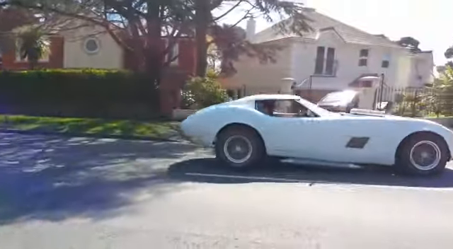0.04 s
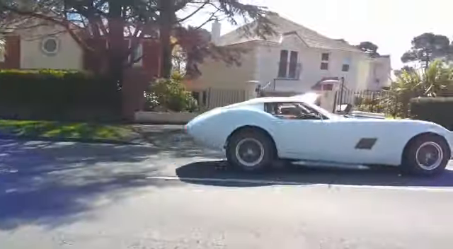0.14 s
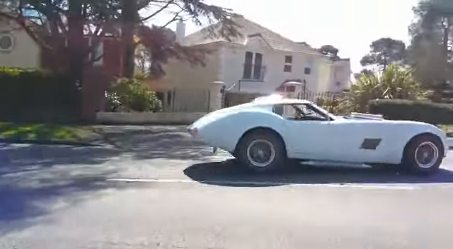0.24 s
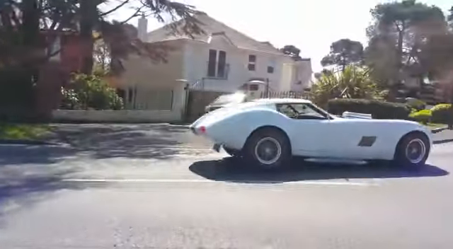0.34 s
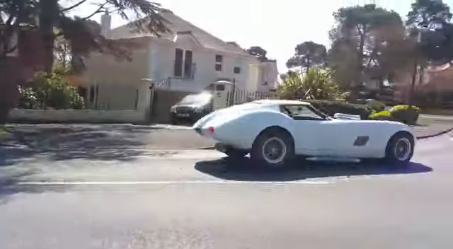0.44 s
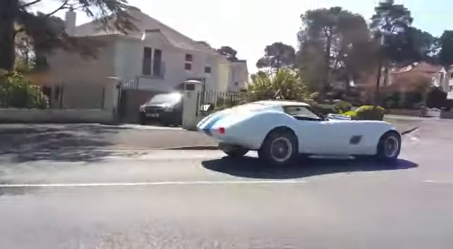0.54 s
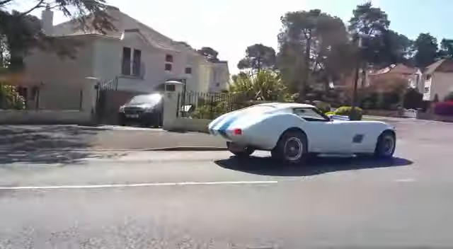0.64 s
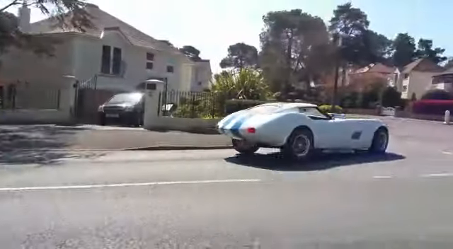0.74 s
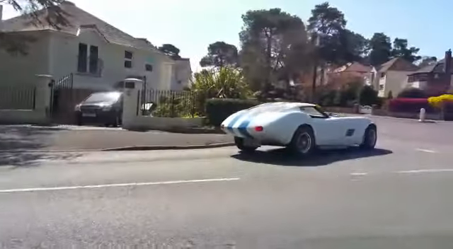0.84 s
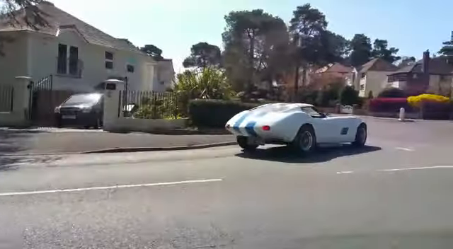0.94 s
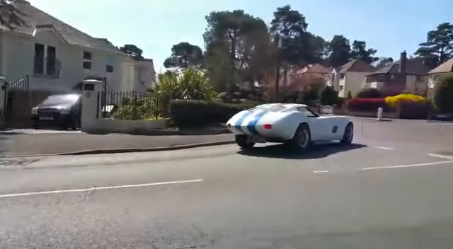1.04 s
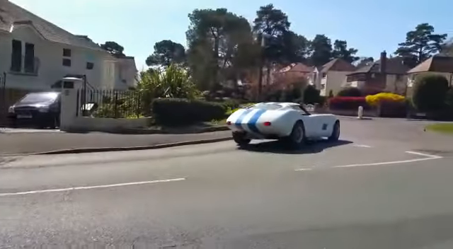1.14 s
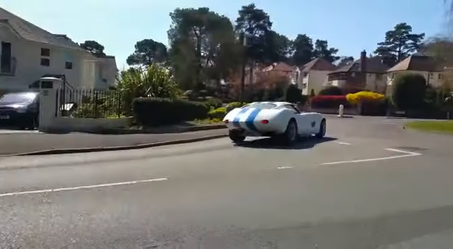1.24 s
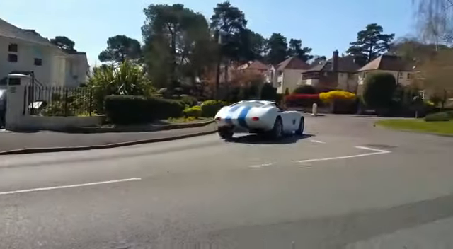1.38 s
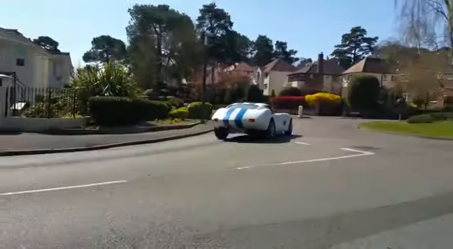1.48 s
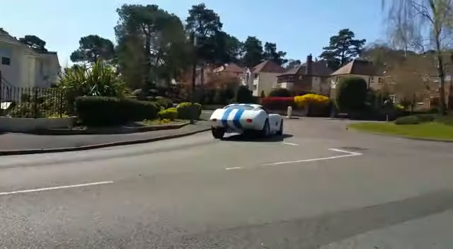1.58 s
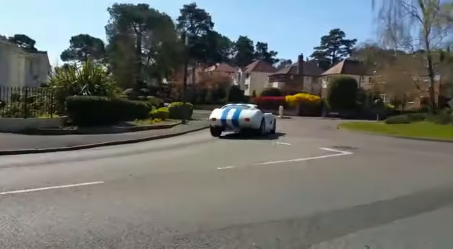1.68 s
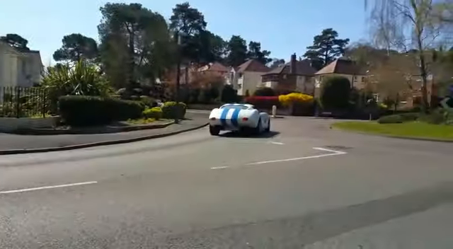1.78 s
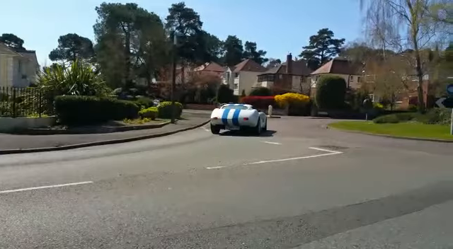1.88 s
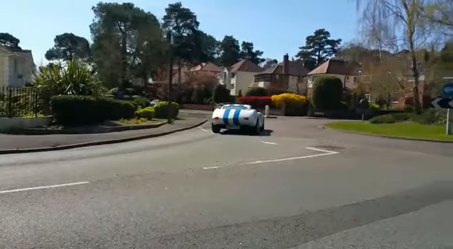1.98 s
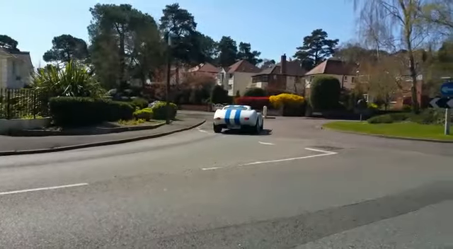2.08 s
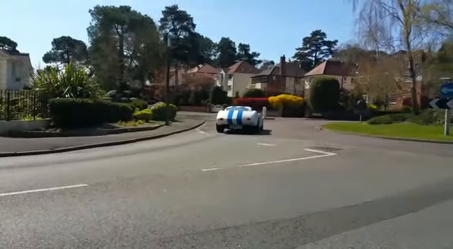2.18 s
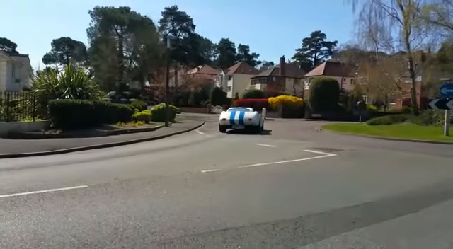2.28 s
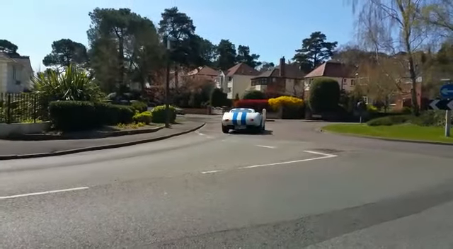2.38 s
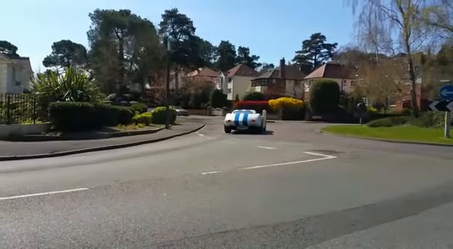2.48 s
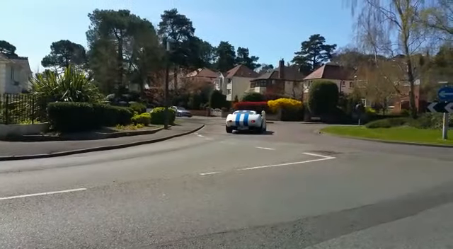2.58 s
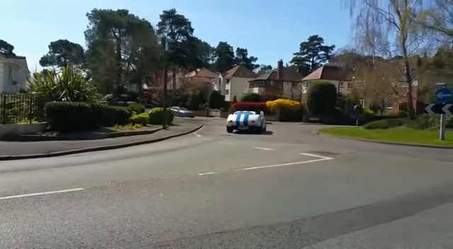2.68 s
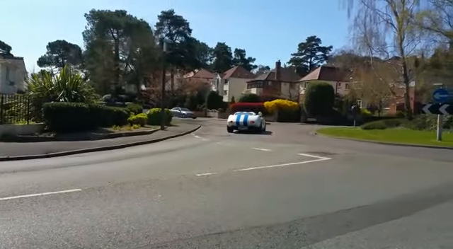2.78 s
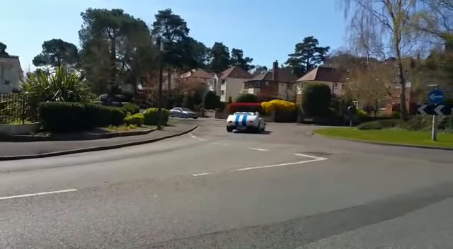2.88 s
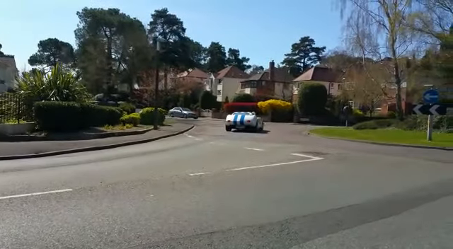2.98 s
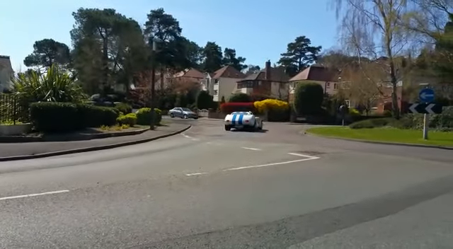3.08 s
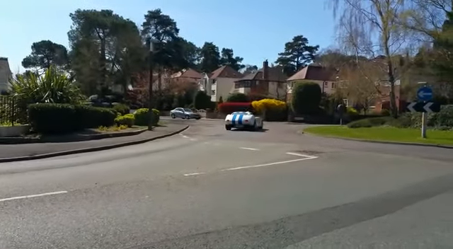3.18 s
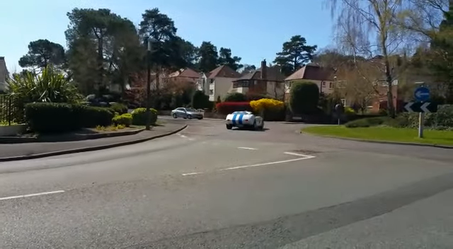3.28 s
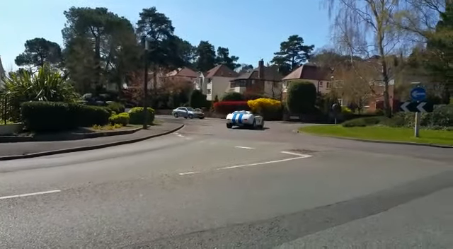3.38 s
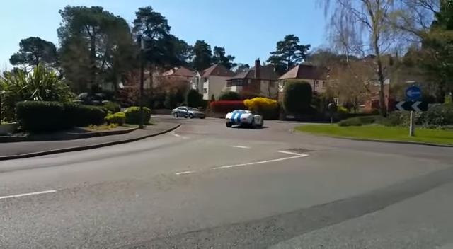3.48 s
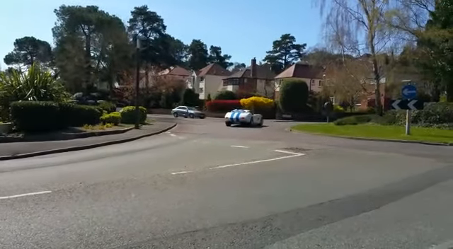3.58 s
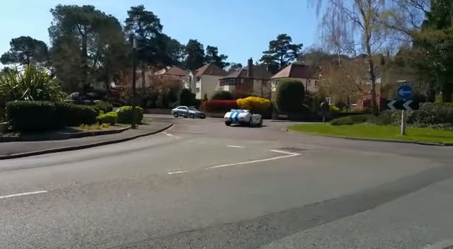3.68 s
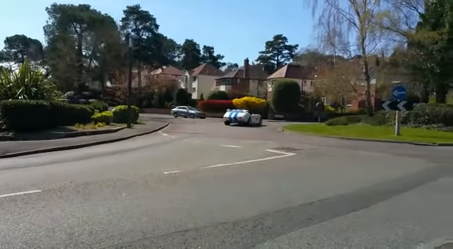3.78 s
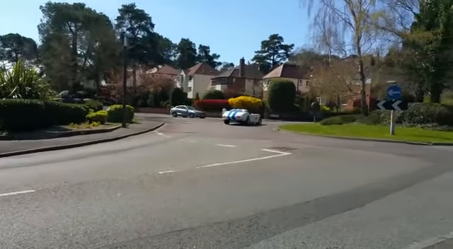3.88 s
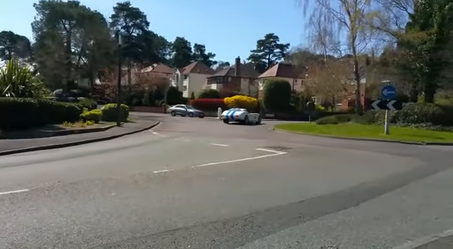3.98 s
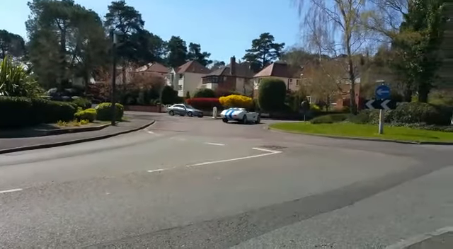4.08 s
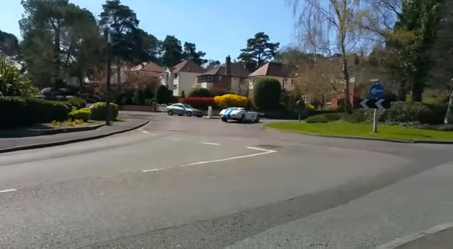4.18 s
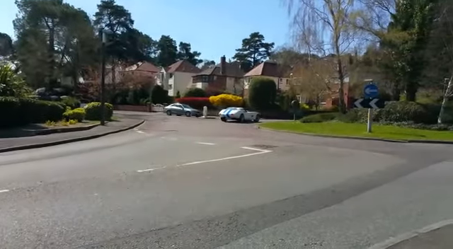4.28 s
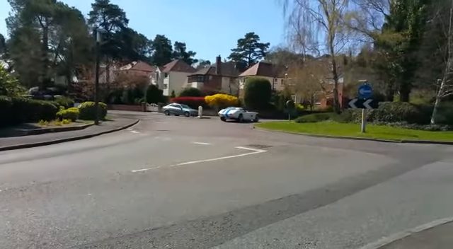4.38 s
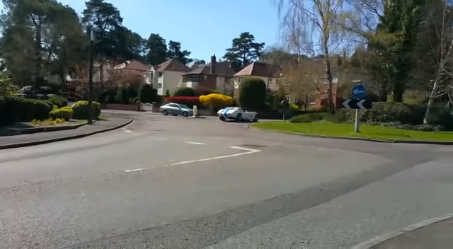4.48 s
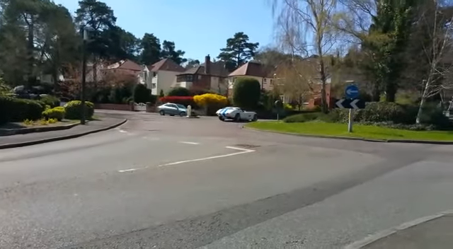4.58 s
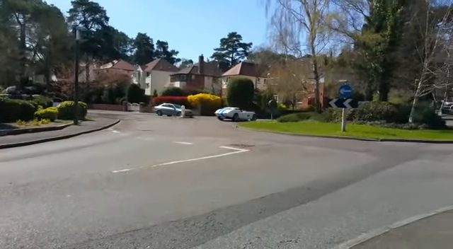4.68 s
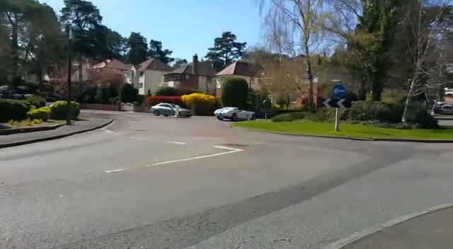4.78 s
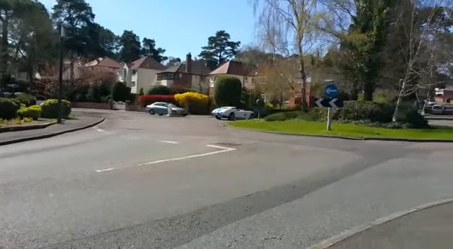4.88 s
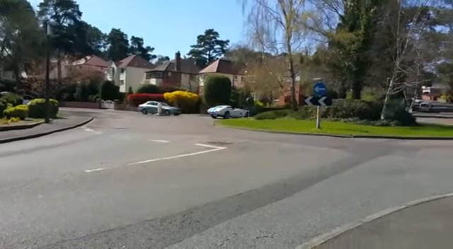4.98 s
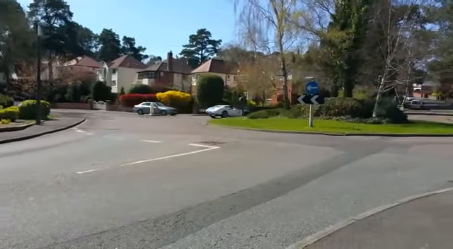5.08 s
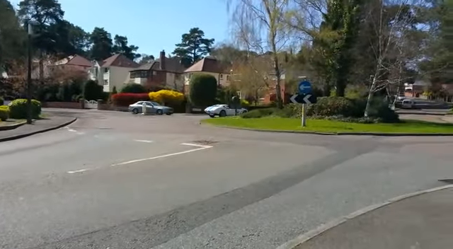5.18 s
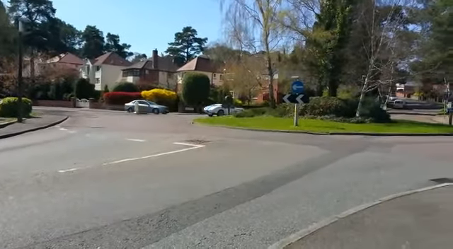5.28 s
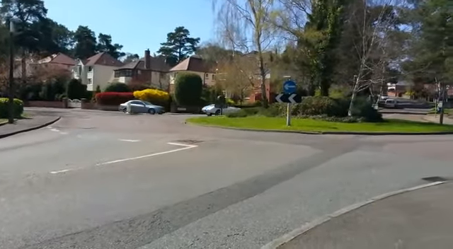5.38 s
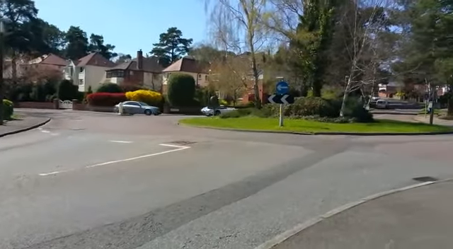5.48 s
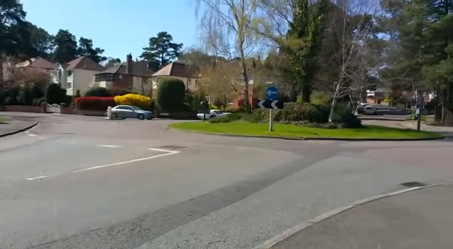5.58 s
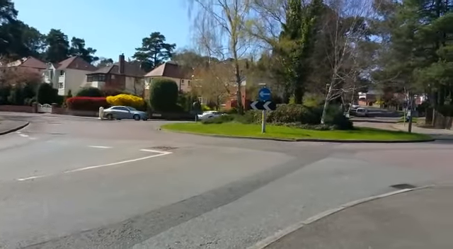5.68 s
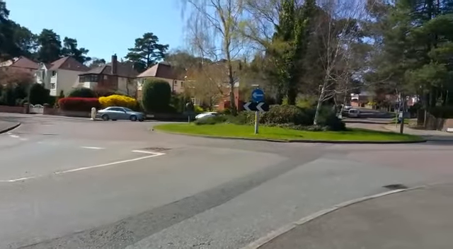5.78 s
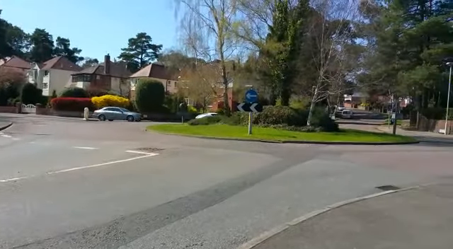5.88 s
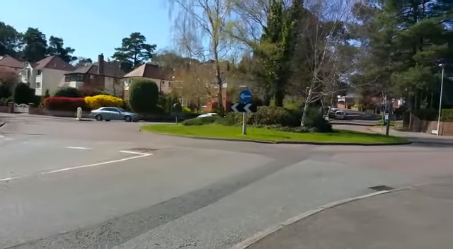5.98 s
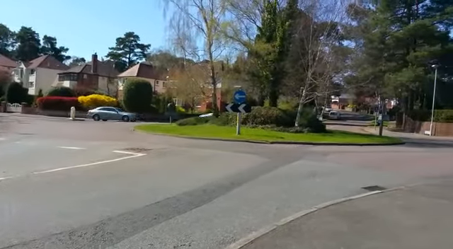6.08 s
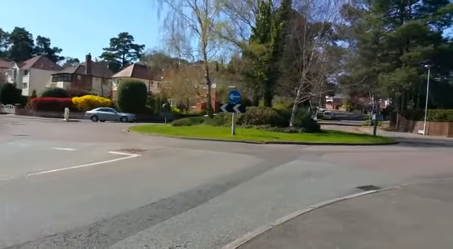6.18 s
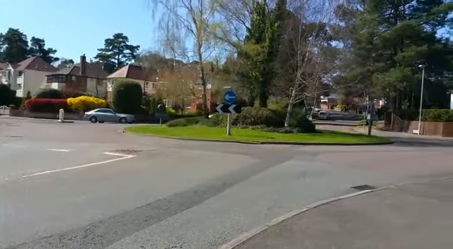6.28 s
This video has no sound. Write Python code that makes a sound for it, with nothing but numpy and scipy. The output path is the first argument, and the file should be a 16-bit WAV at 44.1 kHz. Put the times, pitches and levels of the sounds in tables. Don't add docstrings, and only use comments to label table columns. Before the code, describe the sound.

A low, uneven V8 burble pulls away down a sunny residential street with tyre hiss, then a second car's tyres rush nearer.

```python
import sys
import numpy as np
from scipy import signal
from scipy.fft import rfft, irfft, next_fast_len
from scipy.io import wavfile
from scipy.ndimage import uniform_filter1d

SR = 44100
rng = np.random.default_rng(int(sys.argv[2]) if len(sys.argv) > 2 else 0)


def natural_amplitude(level_db):
    exponent = np.asarray(level_db, float) / 20
    return 10 ** exponent


def int16_out(signal):
    q = np.round(np.clip(np.atleast_2d(signal).T, -1, 1) * 32767)
    wavfile.write(sys.argv[1], SR, q.astype(np.int16))


N = 279594
T = np.arange(N) / SR
HOP = 256
FRAMES = np.arange(N // HOP + 5) * HOP / SR

# frequency_hz, level_db
PIPES_BEAT = [(30, -47), (50, -10), (70, -5), (98, 1.5), (120, 5), (138, -2), (165, 0.5), (195, -14.5),
              (240, -33), (400, -48), (900, -69), (2500, -100)]
# time_s, throttle_db (level of the even firing), flank_deg (side shown)
DRIVE = [(0, -30.5, 80), (.15, -31.5, 48), (.45, -29.5, 23.5), (.7, -28, 31), (1.05, -25.5, 57),
         (1.32, -22.5, 48), (1.6, -22, 20.4), (2.1, -21.5, 6), (2.64, -23, 8.5), (2.85, -31.5, 7.2),
         (3.5, -32, 9.8), (3.8, -30.5, 12.5), (4.15, -30, 20), (4.5, -35, 71), (4.8, -34.5, 67),
         (5.4, -34, 64), (5.8, -36, 85), (6.34, -32, 20.5)]

NEAREST_M, SPEED_M_S = 8.1, 8.9
TURN_S, TURN_LENGTH_S = 4.12, 1
CLEAR_LENGTH_S = 0.85


def read(points, hz):
    table_hz, value = np.transpose(points)
    return np.interp(np.log(hz + 1), np.log(table_hz + 1), value)


def curves(rows, t):
    s, *columns = np.transpose(rows)
    return [np.interp(t, s, c) for c in columns]


def ramp(t, middle_s, length_s):
    return .5 + .5 * np.tanh(2 * (t - middle_s) / length_s)


def distance(t):
    return np.hypot(NEAREST_M, SPEED_M_S * t)


def band_noise(edges_hz):
    band = signal.butter(2, edges_hz, "band", fs=SR, output="sos")
    roar = signal.sosfilt(band, rng.standard_normal(N))
    return roar / roar.std()


def hiss(points, left_points, level_db, bright_db, lag_ms, spread, patchy_db):
    # frequency_hz, coherent_share
    likeness = [(50, 1), (300, 0.98), (800, 0.98), (2000, 0.79), (5000, 0.22), (15000, 0.21)]
    hz = np.fft.rfftfreq(1024, 1 / SR)[:, None]
    a, b, c, d, e, f, patches = rng.standard_normal((len(FRAMES), 513, 7)).T
    patches = uniform_filter1d(patches, size=10, axis=0)
    patches = uniform_filter1d(patches, size=12, axis=1) * np.sqrt(10 * 12)
    same = np.clip(read(likeness, hz), 0, 1) ** spread
    own = np.sqrt(1 - same ** 2)
    shared = same * (a + 1j * b)
    left = shared * np.exp(-2j * np.pi * hz * lag_ms / 1000) + own * (c + 1j * d)
    right = shared + own * (e + 1j * f)
    shape = natural_amplitude(read(points, hz))
    shape = shape / np.sqrt(np.sum(shape ** 2))
    treble_db = bright_db / (1 + (3500 / (hz + 1)) ** 4)
    shape = shape * natural_amplitude(level_db + treble_db + patchy_db * patches)
    both = np.array([left * natural_amplitude(read(left_points, hz)), right]) * shape
    return signal.istft(both, nperseg=1024, noverlap=1024 - HOP)[1][:, :N]


def tone(rows, waver_hz):
    hz, level_db = curves(rows, T)
    hz = hz + waver_hz * np.interp(T, FRAMES, rng.standard_normal(len(FRAMES)))
    level = np.sqrt(2) * natural_amplitude(level_db) * (T < rows[-1][0])
    return level * np.sin(2 * np.pi * np.cumsum(hz) / SR)


def street():
    # frequency_hz, level_db
    spectrum = [(25, -18.5), (55, -21), (100, 2.5), (200, -3.5), (320, -11.5), (500, -21), (1000, -20),
                (1400, -30.5), (1900, -14.5), (2600, -34), (3500, -34), (6300, -39.5), (7600, -54.5),
                (15500, -58.5)]
    # frequency_hz, gain_db
    left_shading = [(900, 2), (1300, 12), (1900, -13), (2500, 7), (3500, 0.5), (5000, -2), (7500, 4),
                    (12000, 2.5)]
    return hiss(spectrum, left_shading, level_db=-28.5, bright_db=0, lag_ms=-0.063, spread=1.8, patchy_db=1.0)


def whine():
    start_hz, rise_hz_s, level_db = 14010, 54, -80
    return tone([(s, start_hz + rise_hz_s * s, level_db) for s in (0, N / SR)], 12)


def clicks():
    # start_s, peak_db, left_minus_right_db, length_ms, lowest_hz
    events = [(.255, -40, 10, 6.6, 1990), (.31, -51, 11, 6, 2010), (.45, -59, 3, 4.5, 8000),
              (1.175, -30.5, -16, 5.7, 2980), (3.7716, -23.5, 22, 0.26, 7500), (4.606, -40, -21, 9.9, 2500),
              (4.713, -49, -10, .4, 3000), (4.715, -34, -28, 10, 3000), (4.724, -46, -22, 23, 5000),
              (4.79, -51, -19, 24, 6000), (5.612, -34, 4, 3.7, 6000)]
    out = np.zeros((2, N))
    bursts = rng.standard_normal((len(events), 2000))
    for (start_s, peak_db, pan_db, length_ms, low_hz), burst in zip(events, bursts):
        t = np.arange(2000) / SR * 1000 / length_ms
        envelope = 2 * t * np.exp(1 - 2 * t)
        tick = signal.sosfilt(signal.butter(2, low_hz, "high", fs=SR, output="sos"), burst * envelope)
        if length_ms > 1:
            tick = signal.lfilter([.5], [1, -.75], tick)
            tick = signal.sosfilt(signal.butter(2, 11500, fs=SR, output="sos"), tick)
        at = round(start_s * SR)
        port_gain = natural_amplitude([[min(pan_db, 0)], [min(-pan_db, 0)]])
        out[:, at:at + 2000] += natural_amplitude(peak_db) * tick * port_gain
    return out


def brake_squeak():
    # time_s, pitch_hz, level_db
    glide = [
        (0, 13300, -68),
        (.006, 13300, -42),
        (.015, 13180, -54),
        (.025, 13200, -57),
        (.05, 13050, -70),
    ]
    return tone(glide, 54)


def saloon_tyres():
    # frequency_hz, level_db
    spectrum = [(150, -30.5), (300, 1.5), (800, 3.5), (1100, 3.5), (1700, 3), (2300, 0), (3000, -15.5),
                (4100, -11.5), (5400, -29.5), (6400, -22.5), (7500, -30.5), (10500, -28.5), (12000, -40),
                (15500, -35)]
    # frequency_hz, gain_db
    left_shading = [(900, 0), (1500, -0.5), (2100, -1.5), (2600, -12), (3400, 5), (4000, -7), (5100, 9.5),
                    (7500, 0), (10500, 0.5), (12000, -5)]
    peak_db, nearest_s, nearest_m, speed_m_s = -28.5, 5.42, 7.47, 6.9
    screened_db, clear_s = -11.5, 5.26
    since_s = FRAMES - nearest_s
    level_db = peak_db - 20 * np.log10(np.hypot(1, speed_m_s * since_s / nearest_m))
    bright_db = screened_db * (1 - ramp(FRAMES, clear_s, CLEAR_LENGTH_S))
    lag_ms = -0.43 - 0.027 * since_s
    return hiss(spectrum, left_shading, level_db, bright_db, lag_ms, spread=0.093, patchy_db=1.0)


def saloon_hum():
    # time_s, pitch_hz, level_db
    glide = [
        (4.9, 280, -65),
        (5.3, 277, -39.5),
        (5.8, 272.5, -39.5),
        (6.34, 268.4, -42),
    ]
    return tone(glide, 6.5)


def tread():
    # low_hz, high_hz
    edges_hz = [3930, 4280]
    level_db, abreast_s = -54, 5.2
    return natural_amplitude(level_db) * ramp(T, abreast_s, CLEAR_LENGTH_S) * band_noise(edges_hz)


def sports_tyres():
    # frequency_hz, level_db
    spectrum = [(150, -36), (250, -4), (340, -16.5), (430, -5.5), (700, 2), (1100, -1), (1400, -8),
                (1700, -7), (2500, -2.5), (3200, -11.5), (4300, -24.5), (6100, -19.5), (7300, -29.5),
                (10000, -34), (15500, -41.5)]
    # frequency_hz, gain_db
    left_shading = [(900, 1), (1400, 6), (1750, -8.5), (2050, 4), (2500, -43), (3000, -10), (4300, 11.5),
                    (5200, -4.5), (7400, -2.5), (9300, 4.5), (11000, 1.5)]
    nearest_db, spreading, island_db, air_db_m = -30.5, 0.27, -15.5, -.5
    metres = distance(FRAMES)
    level_db = nearest_db - spreading * 20 * np.log10(metres / NEAREST_M)
    level_db = level_db + island_db * ramp(FRAMES, TURN_S, 2 * TURN_LENGTH_S)
    bright_db = air_db_m * (metres - NEAREST_M)
    lag_ms = 0.17 - 0.067 * np.exp(-FRAMES / 0.14)
    return hiss(spectrum, left_shading, level_db, bright_db, lag_ms, spread=0.99, patchy_db=1.0)


def intake():
    # low_hz, high_hz
    edges_hz = [570, 813]
    peak_db, peak_s, fall_db_s = -30, 0.074, -24.5
    return natural_amplitude(peak_db + fall_db_s * abs(T - peak_s)) * band_noise(edges_hz)


def growl(puffs):
    # low_hz, high_hz
    edges_hz = [230, 437]
    level_db = curves(DRIVE, T)[0] - 18.5
    return natural_amplitude(level_db) * (1 + 0.79 * (puffs - puffs.mean())) * band_noise(edges_hz)


def engine_levels():
    # time_s, cycles_hz
    revs = [(0, 6.77), (.15, 6.1), (.45, 5.96), (.7, 6.38), (1.05, 7.8), (1.32, 9.25), (1.6, 9.25),
            (2.1, 9.77), (2.66, 9.62), (2.93, 7.9), (3.45, 7.75), (3.8, 8.28), (4.1, 8.45), (4.5, 9.03),
            (4.8, 9.85), (5.4, 9.9), (5.8, 10.58), (6.34, 10.45)]
    flank_db, weak_db, weak_turned_db = 11, -6, 2.5
    nearest_scatter_db, steadying, coast_db = -31, 0.29, -32
    cycle_hz = curves(revs, T)[0]
    even_db, flank_deg = curves(DRIVE, T)
    beat_db = even_db + flank_db + 20 * np.log10(abs(np.sin(np.radians(flank_deg))) + 1e-3)
    weak_db = even_db + weak_db + weak_turned_db * ramp(T, TURN_S, TURN_LENGTH_S)
    scatter_db = nearest_scatter_db - 20 * np.log10(distance(T) / NEAREST_M)
    scatter_db = scatter_db - steadying * (even_db - coast_db)
    return cycle_hz, even_db, beat_db, weak_db, scatter_db


def colour(x, points):
    size, lead, length = 1 << 16, 4096, 16384
    hz = abs(np.fft.fftfreq(size, 1 / SR))
    phase = -signal.hilbert(np.log(natural_amplitude(read(PIPES_BEAT, hz)))).imag
    response = np.fft.ifft(natural_amplitude(read(points, hz)) * np.exp(1j * phase)).real
    taps = np.roll(response, lead)[:length] * signal.windows.tukey(length, .4)
    return signal.oaconvolve(x, taps)[lead:N + lead]


def echoed(x):
    # time_s, delay_ms
    echo = [(0, 25.3), (.6, 31.3), (1.3, 24.3), (1.8, 24.6), (3.4, 24.5), (4.2, 27), (4.7, 24.4),
            (5.3, 21.7), (5.9, 26)]
    late = np.interp(T - curves(echo, T)[0] / 1000, T, x, left=0)
    share = 0.36 * (0.54 + 0.48 * ramp(T, 0.89, .4))
    return (x + share * late) / np.hypot(1, share)


def exhaust(start=.24):
    bank = [1, -1, -1, 1, -1, 1, 1, -1]
    # frequency_hz, level_db
    pipes_sum = [(20, -30), (48, -6), (63, -4), (78, 0), (100, -1), (126, -8), (140, -14), (160, -17),
                 (200, -16), (250, -28), (400, -48), (900, -75), (2500, -100)]
    # frequency_hz, level_db
    pipes_weak = [(20, -55), (48, -51), (70, -3.5), (98, -4), (118, 1.5), (138, -7.5), (155, -12.5),
                  (176, 3), (196, -8.5), (250, -16), (320, -14), (420, -43), (900, -81), (2500, -100)]
    # time_s, share_left
    misses = [(.003, .3), (.158, .5), (.178, .15), (.198, .5), (.282, .25), (.322, .4), (.488, .4),
              (.508, .5), (.804, .5)]
    cycle_hz, even_db, beat_db, weak_db, scatter_db = engine_levels()
    count = np.floor(8 * (start + np.cumsum(cycle_hz) / SR)).astype(int)
    fires = np.diff(count, prepend=count[0]) * SR / (8 * cycle_hz * np.sqrt(2))
    for miss_s, share in misses:
        fires = np.where(abs(T - miss_s) < .009, share * fires, fires)
    slot = count % 8
    luck = rng.standard_normal(1000)[count]

    def pipe_gain(points, *orders):
        return np.sqrt(sum(natural_amplitude(read(points, k * cycle_hz)) ** 2 for k in orders))

    even = natural_amplitude(even_db) / pipe_gain(pipes_sum, 8)
    beat = natural_amplitude(beat_db) / pipe_gain(PIPES_BEAT, 11, 13) * np.take(bank, slot) / .653
    weak = natural_amplitude(weak_db) / pipe_gain(pipes_weak, 10, 12) * (1 - 4 * (slot % 4 == 2))
    pulses = colour(fires * even, pipes_sum)
    pulses = pulses + echoed(colour(fires * (beat + natural_amplitude(scatter_db) * luck), PIPES_BEAT))
    pulses = -pulses - colour(fires * weak, pipes_weak)

    low = signal.sosfiltfilt(signal.butter(4, 150, fs=SR, output="sos"), pulses)
    turned = 0.87 * ramp(T, TURN_S, TURN_LENGTH_S)
    walls = 0.3 * np.exp(-((T - 1.28) / 0.39) ** 2)
    pulses = pulses - np.clip(turned + walls, 0, 1) * (pulses - low)
    late = np.pad(pulses, (9, 0))[:N]
    return np.array([late, pulses]), abs(fires) > 0


def scene():
    rumble, fires = exhaust()
    puffs = signal.lfilter([1], [1, -np.exp(-1 / (0.0085 * SR))], fires)
    background = street() + whine() + clicks() + brake_squeak()
    saloon = saloon_tyres() + saloon_hum() + tread()
    sports = sports_tyres() * (1 + 0.35 * puffs) + intake() + growl(puffs) + rumble
    return background + saloon + sports


def top_cut(x):
    return signal.sosfilt(signal.butter(12, 15710, fs=SR, output="sos"), x)


def record(dry):
    # frequency_hz, gain_db
    ports = [(60, 0.65), (1000, -1.25), (5100, 0.5), (5900, -8), (6500, -10), (7400, -2.5), (15000, -2)]
    size = next_fast_len(N)
    hz = np.fft.rfftfreq(size, 1 / SR)
    edges = natural_amplitude(-60 * (hz > 15720)) / np.sqrt(1 + (30 / (hz + 1)) ** 8)
    shading = natural_amplitude([read(ports, hz), 0 * hz])
    heard = irfft(rfft(dry, size) * edges * shading, size)[:, :N]
    rounded = heard / (1 + (abs(heard) / .6) ** 4) ** (1 / 4)
    return top_cut(rounded)


dry = scene()
out = record(dry)
int16_out(out)
```